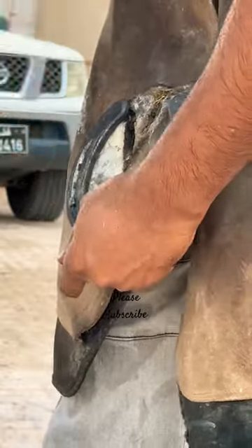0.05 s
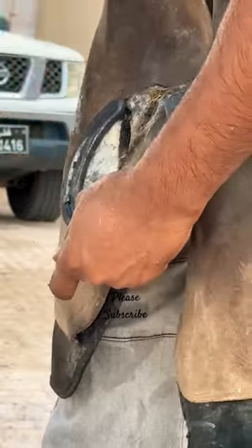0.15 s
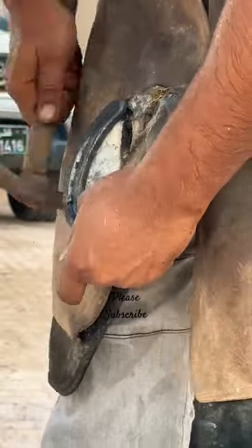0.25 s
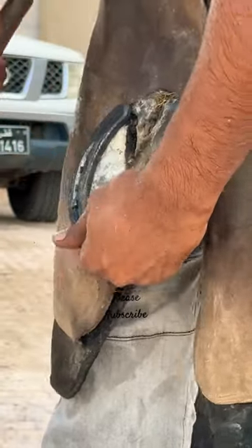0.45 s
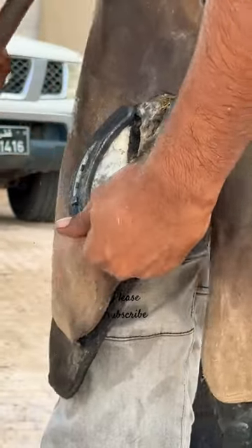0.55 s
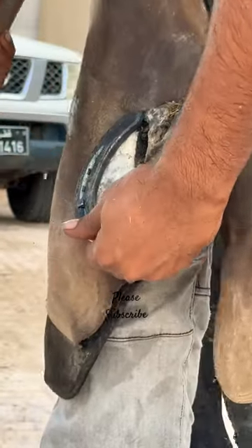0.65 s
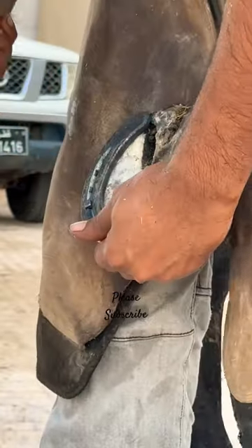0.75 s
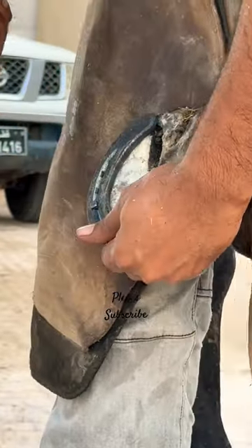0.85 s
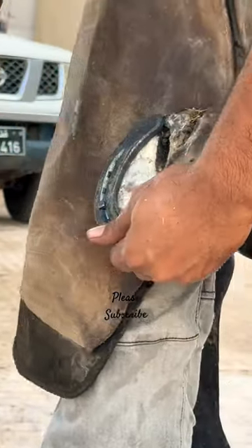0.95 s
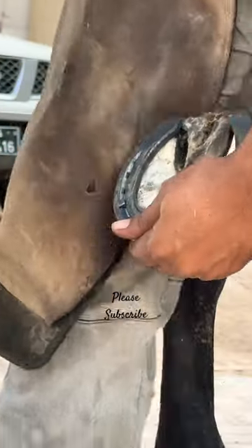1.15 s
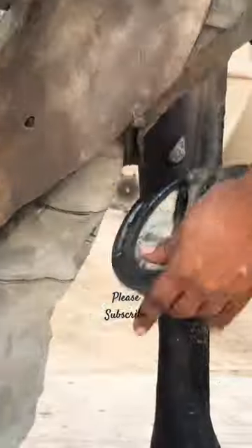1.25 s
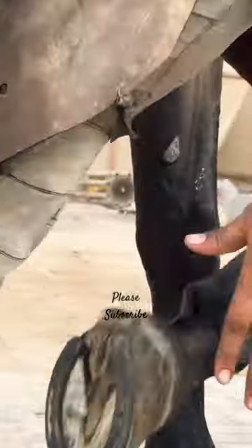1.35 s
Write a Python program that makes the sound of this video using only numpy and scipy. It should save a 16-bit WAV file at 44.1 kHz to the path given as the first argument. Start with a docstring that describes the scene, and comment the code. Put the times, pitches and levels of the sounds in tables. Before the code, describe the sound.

One metallic hammer clack on a horseshoe rings briefly outdoors, followed by faint rubbing.

```python
"""A walled yard, with a stereo microphone close to a farrier. An engine idles in the background, under
outdoor air and a steady high hiss. The hammer strikes a steel horseshoe on a raised hoof once: a hard
clack from the shoe, a dull knock from the hoof and a thin high ring from the hammer. The walls answer
briefly. Then hands and leather apron rub and tick as the hoof is let down."""
import sys
import numpy as np
from scipy.fft import rfft, irfft, next_fast_len
from scipy.io import wavfile
from scipy.ndimage import map_coordinates

SR = 44100
rng = np.random.default_rng(int(sys.argv[2]) if len(sys.argv) > 2 else 0)


def digitize_waveform(pressure):
    """Quantize a signal to 16-bit integers and store it at the path in sys.argv[1].

    Rows of a 2-D input are taken as channels; values are limited to [-1, 1].
    """
    field = np.atleast_2d(pressure).T
    bounded = np.clip(field, -1, 1)
    quanta = np.round(bounded * 32767).astype(np.int16)
    wavfile.write(sys.argv[1], SR, quanta)


N = 61739
STRIKE_S, CLACK_ATTACK_S = .2142, .0003
KNOCK_S = STRIKE_S + .0022  # the hoof takes the blow a moment later


def amp(db):
    """Decibels to gain."""
    return 10 ** (np.asarray(db) / 20)


def unit(x):
    """Scale to rms 1."""
    return x / np.sqrt(np.mean(x ** 2) + 1e-20)


def along(points, hz):
    """Read (freq_hz, value) points on a log frequency axis."""
    freqs, values = np.transpose(points)
    return np.interp(np.log(hz + 1), np.log(freqs + 1), values)


def since(start_s):
    """Seconds since the start, zero before it."""
    return np.maximum(np.arange(N) / SR - start_s, 0)


def envelope(start_s, attack_s, t60_s):
    """A quick rise and an exponential decay."""
    t = since(start_s)
    return (1 - np.exp(-t / attack_s)) * amp(-60 * t / t60_s)


def wobble(rate_hz):
    """A smooth random curve through rate_hz knots a second."""
    return map_coordinates(rng.standard_normal(4096), [since(0) * rate_hz], mode="wrap")


def filtered(x, response):
    """Pass x through a complex frequency response."""
    size = next_fast_len(N + 8192)
    return irfft(rfft(x, size) * response(np.fft.rfftfreq(size, 1 / SR)), size)[..., :N]


def noise(colour):
    """Coloured noise of rms 1."""
    return unit(filtered(rng.standard_normal(N), lambda hz: amp(along(colour, hz))))


def ringing(modes, start_s, attack_s, alternate=True):
    """Damped modes set off together; if alternate, neighbours swing in opposite directions."""
    sign = -1 if alternate else 1
    t = since(start_s)
    return sum(sign ** k * amp(db) * envelope(start_s, attack_s, t60_s) * np.sin(2 * np.pi * hz * t)
               for k, (hz, db, t60_s) in enumerate(modes))


def puffs(rows, t60_s, octaves, attack_s):
    """Short bursts of noise, each around its own pitch."""
    def band(pitch_hz):
        bell = lambda hz: np.exp(-.5 * (np.log2((hz + 1) / pitch_hz) / octaves) ** 2)
        return unit(filtered(rng.standard_normal(N), bell))
    return sum(amp(db) * envelope(s, attack_s, t60_s) * band(hz) for s, db, hz in rows)


# Stereo width of diffuse sound at the microphone: freq_hz, side_db
WIDTH = [(100, -54), (300, -13.5), (800, -2), (1300, -6), (1800, -37), (4800, -40), (6500, -21),
         (10000, -13)]

def diffuse(colour):
    """Coloured stereo noise reaching the microphone from all around."""
    mid = noise(colour)
    side = filtered(noise(colour), lambda hz: amp(along(WIDTH, hz)))
    return np.array([mid + side, mid - side])


# Noise colours for the open air and the high hiss: freq_hz, level_db
AIR_COLOUR = [(100, -2), (260, 1), (450, -8.5), (900, -9), (1600, -17), (3000, -24.5), (4500, -27),
              (9700, -37), (11000, -66)]
HISS_COLOUR = [(3000, -57), (4400, -22), (5050, 0.5), (5600, -0.5), (6400, -1.5), (7300, -12),
               (8500, -24.5), (10000, -20.5), (11000, -65)]

def outdoor_air():
    """Soft air and a steady high hiss, all around the yard."""
    return amp(-56.5) * diffuse(AIR_COLOUR) + amp(-55) * diffuse(HISS_COLOUR)


# Engine orders: pitch_hz, level_db
ENGINE_ORDERS = [(71.2, -51.5), (106.7, -52.5)]
# Noise colour for the engine's rumble: freq_hz, level_db
RUMBLE_COLOUR = [(20, -42), (35, -24), (50, -0.5), (68, -1.5), (85, -3), (105, -0.5), (130, -9.5),
                 (200, -18.5), (300, -24.5), (600, -52.5)]
# Slow dip and recovery of the whole engine: time_s, gain_db
ENGINE_LEVEL = [(0, 1.5), (0.402, -0.5), (.6, -2), (.8, -2.5), (1.05, 1), (1.3, 1), (1.4, 1.5)]

def engine():
    """An engine idling some way off: two unsteady low orders in a bed of rumble."""
    sway_db, drift_rad = 2, .6
    hum = 0
    for hz, db in ENGINE_ORDERS:
        peak = np.sqrt(2) * amp(db + sway_db * wobble(12))
        hum += peak * np.sin(2 * np.pi * hz * since(0) + drift_rad * wobble(9.26))
    rumble = amp(-47.5) * noise(RUMBLE_COLOUR)
    return amp(np.interp(since(0), *np.transpose(ENGINE_LEVEL))) * (hum + rumble)


# Echoes from two walls a few metres away: delay_s, level_db
WALLS = [(.0164, -10), (.0240, -17)]

def wall_echoes(knock):
    """Each wall returns the knock late, quieter and duller."""
    dull_hz = 3500
    delays = lambda hz: sum(amp(db) * np.exp(-2j * np.pi * hz * s) for s, db in WALLS)
    return amp(-4.5) * filtered(knock, lambda hz: delays(hz) / (1 + 1j * hz / dull_hz))


# Noise colours for the scatter and the tail, each with a gap cut at about 11-14 kHz: freq_hz, level_db
SCATTER_COLOUR = [(100, -3.5), (250, -1), (600, 2.5), (1000, 1.5), (1500, -5), (2600, -3.5), (4500, -9.5),
                  (6000, -5), (6700, -5), (7500, -3.5), (9600, -10.5), (10500, -22), (11500, -55),
                  (13500, -47), (15000, -15), (16500, -45)]
TAIL_COLOUR = [(200, -1.5), (800, -1.5), (1500, -6), (2400, 2.5), (3300, -1.5), (4500, -3.5), (8000, 1.5),
               (9600, -1.5), (10500, -18), (11500, -48), (13500, -40), (15000, -13), (16500, -45)]

def yard_scatter():
    """The blow scatters off the ground, again off the nearest wall, and leaves a faint longer tail."""
    ground = amp(-24) * envelope(KNOCK_S, CLACK_ATTACK_S, t60_s=.1)
    wall = amp(-22.5) * envelope(KNOCK_S + WALLS[0][0], CLACK_ATTACK_S, t60_s=.054)
    tail = amp(-34.5) * envelope(KNOCK_S, attack_s=.002, t60_s=.38)
    return np.hypot(ground, wall) * diffuse(SCATTER_COLOUR) + tail * diffuse(TAIL_COLOUR)


# Hands rubbing on the apron: time_s, level_db
RUB_LEVEL = [(.3, -63), (.56, -64), (.62, -55), (.8, -54.5), (.88, -56.5), (.93, -81), (1.0, -69),
             (1.05, -62.5), (1.12, -63.5), (1.156, -53), (1.18, -58), (1.23, -59.5), (1.26, -72),
             (1.4, -60)]
# Light hissing brushes of cloth: start_s, level_db
BRUSHES = [(0.123, -53.5), (1.028, -51.5), (1.07, -52.5), (1.105, -62)]
# Noise colours for rubbing and brushes, each with a gap cut at about 11-14 kHz: freq_hz, level_db
RUB_COLOUR = [(150, -7), (700, 3), (1300, -1), (2100, 1), (4000, -6.5), (6500, -2.5), (9700, -1),
              (11000, -32), (13500, -40), (15000, -7), (16500, -33)]
BRUSH_COLOUR = [(1500, -21), (4000, -15), (7000, -3), (9300, -2.5), (10300, -2.5), (11500, -43),
                (13500, -28), (15000, -0.5), (16500, -23)]
# Grit ticking under the hand: start_s, level_db, pitch_hz
GRIT_TICKS = [(.315, -43.5, 3000), (.6872, -46.5, 2100), (.7973, -41.5, 2840), (.897, -44, 2100),
              (1.028, -49.5, 2150), (1.052, -57, 3600), (1.153, -46.5, 3020), (1.161, -47.5, 2100),
              (1.198, -44.5, 3770)]
# Soft bumps of the leg against the apron: start_s, level_db, pitch_hz
LEG_BUMPS = [(1.108, -49.5, 360), (1.198, -45.5, 650)]

def handling():
    """Close and central: skin rubs on leather, cloth brushes, grit ticks and the leg bumps."""
    grain = amp(2.5 * wobble(350))
    rub_db = np.interp(since(0), *np.transpose(RUB_LEVEL))
    rub = amp(rub_db) * unit(grain * noise(RUB_COLOUR))
    strokes = sum(amp(db) * envelope(s, attack_s=.006, t60_s=.29) for s, db in BRUSHES)
    brushes = strokes * noise(BRUSH_COLOUR)
    ticks = puffs(GRIT_TICKS, t60_s=.011, octaves=.39, attack_s=.00019)
    bumps = puffs(LEG_BUMPS, t60_s=.065, octaves=.32, attack_s=.002)
    return rub + brushes + ticks + bumps


# Modes of the hoof: pitch_hz, level_db, t60_s
HOOF_MODES = [(200, -38, .03), (420, -17, .011), (800, -9, .008), (1500, -17, .005), (2600, -10, .005),
              (4200, -15, .004)]

def hoof_knock():
    """The hoof takes the blow through the shoe with a dull knock that dies at once."""
    return amp(1) * ringing(HOOF_MODES, KNOCK_S, attack_s=.00017)


# Modes of the hammer's steel: pitch_hz, level_db, t60_s
HAMMER_MODES = [(2330, -38.5, 0.18), (6730, -10.5, 0.1), (6814, -23, 0.18), (7000, -37, 0.44),
                (7930, -38, .07)]

def hammer_ring():
    """The hammer rings freely after the blow, thin and high."""
    return amp(.5) * ringing(HAMMER_MODES, STRIKE_S, attack_s=.0076)


# Noise colour for the crack, with a gap cut at about 11-14 kHz: freq_hz, level_db
CRACK_COLOUR = [(300, -31), (1500, -6), (6500, 0), (9300, -13), (10200, -6), (12000, -26), (13500, -24),
                (15000, -5), (16500, -23)]
# Modes of the shoe, damped by the hoof: pitch_hz, level_db, t60_s
SHOE_MODES = [(740, -23, .02), (1020, -13, .015), (1700, -7, .012), (2170, -16, .015), (2480, -8.5, .012),
              (3250, -8.5, .012), (3780, -13, .015), (4260, -9.5, .013), (4890, -17, .012),
              (5680, -10, .013), (6500, -14, .008), (7650, -5, .009), (9530, -12, .011)]

def shoe_strike():
    """Close to the microphone, steel cracks on steel and the shoe clacks, shifted ahead on the left."""
    left_lead_rad = .41
    crack = amp(-15) * envelope(STRIKE_S, CLACK_ATTACK_S, t60_s=.009) * noise(CRACK_COLOUR)
    clack = ringing(SHOE_MODES, STRIKE_S, CLACK_ATTACK_S, alternate=False)
    return filtered(crack + clack, lambda hz: np.exp(.5j * left_lead_rad * np.outer([1, -1], hz > 0)))


def scene():
    """The background, one blow with the yard's answer, and the handling of the hoof."""
    background = engine() + outdoor_air()
    knock = hoof_knock()
    slightly_left = amp([[.5], [-.5]])
    blow = shoe_strike() + knock * slightly_left + hammer_ring()
    return background + blow + wall_echoes(knock) + yard_scatter() + handling()


# Phase between the microphone's two ports: freq_hz, left_lead_rad
PORT_PHASE = [(20, 0), (400, 0), (800, 0.57), (1300, 0), (5000, 0), (6200, -0.94), (7400, -1.18),
              (10200, -2.5), (14500, -5), (16500, 2.5)]

def record(dry):
    """At the microphone most treble leads on the right; the peak is rounded and the band is limited."""
    ceiling, top_hz = .92, 16500
    ports = filtered(dry, lambda hz: np.exp(.5j * np.outer([1, -1], along(PORT_PHASE, hz))))
    rounded = ports / (1 + (ports / ceiling) ** 4) ** (1 / 4)
    return filtered(rounded, lambda hz: hz < top_hz)


dry = scene()
out = record(dry)
digitize_waveform(out)
```